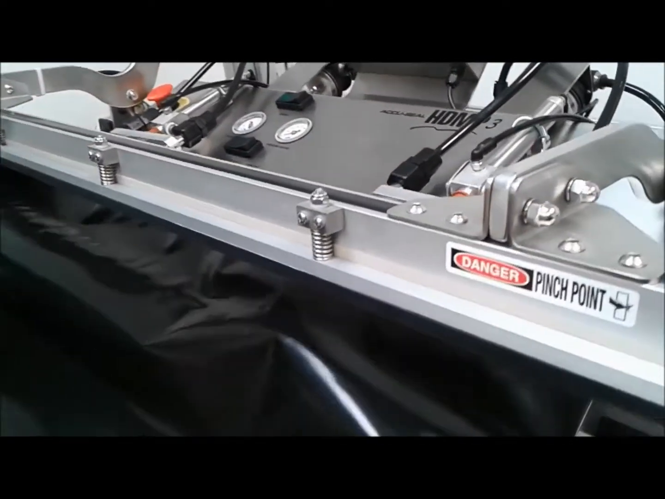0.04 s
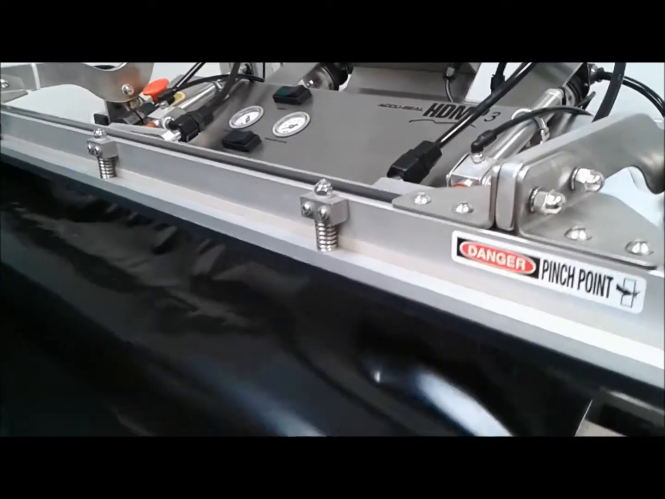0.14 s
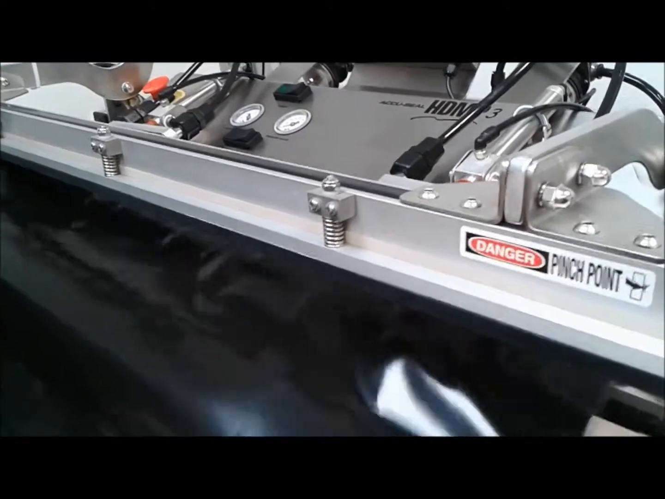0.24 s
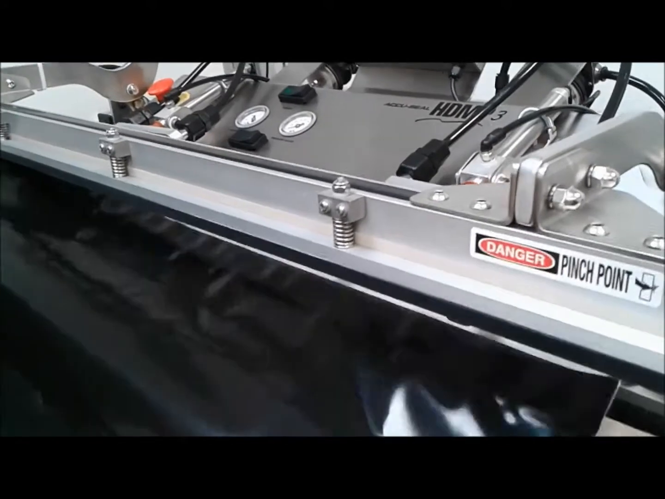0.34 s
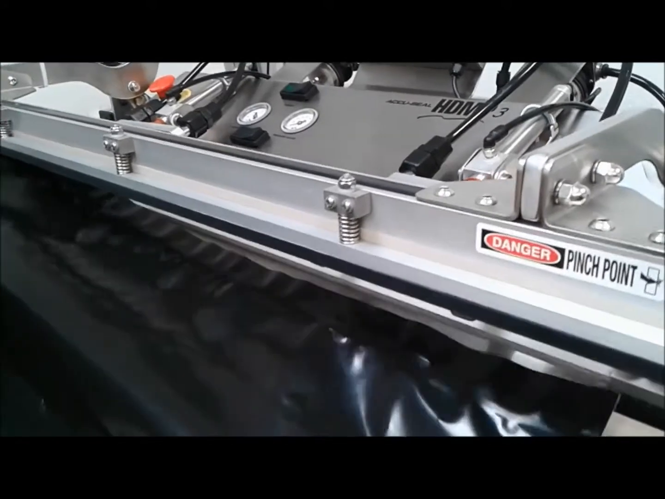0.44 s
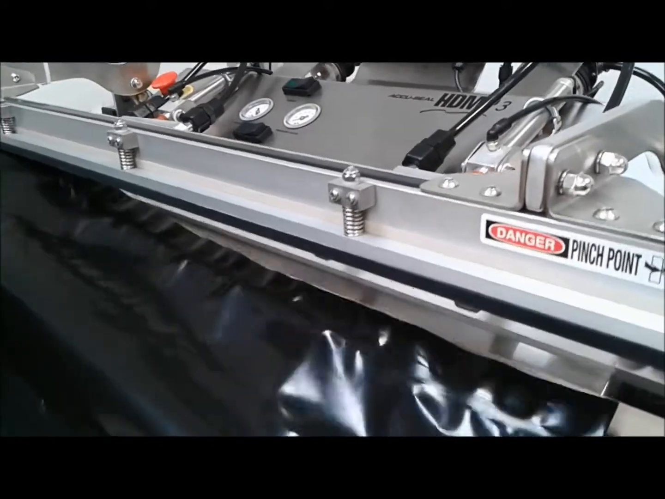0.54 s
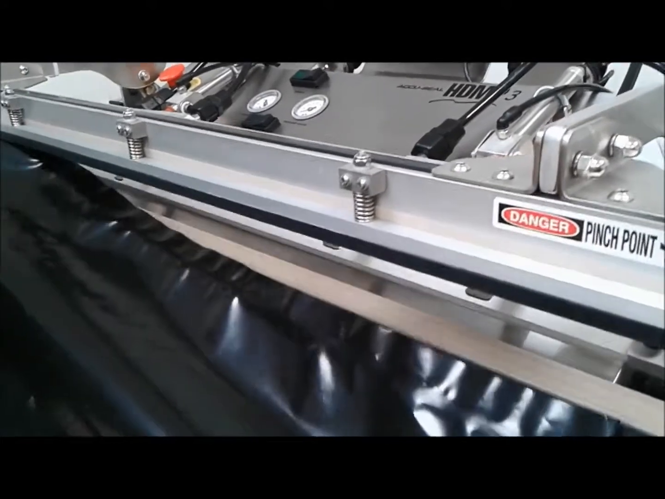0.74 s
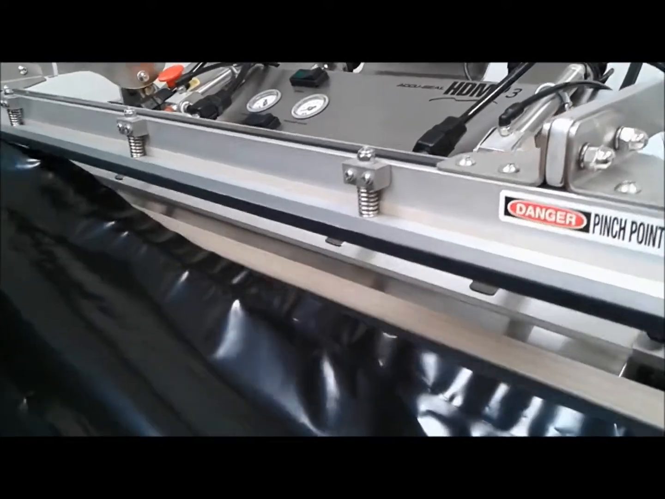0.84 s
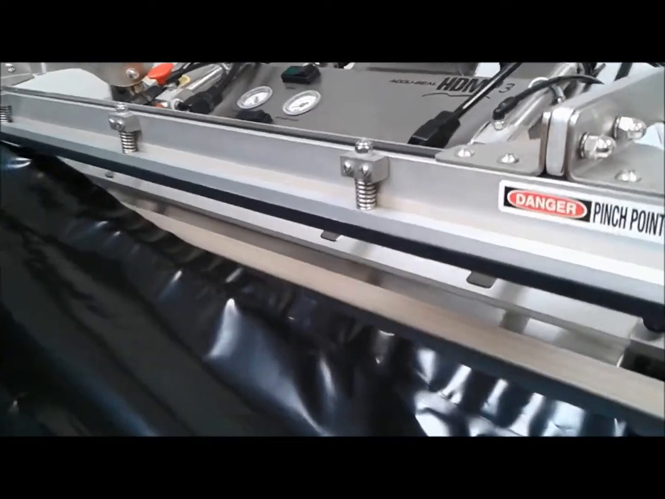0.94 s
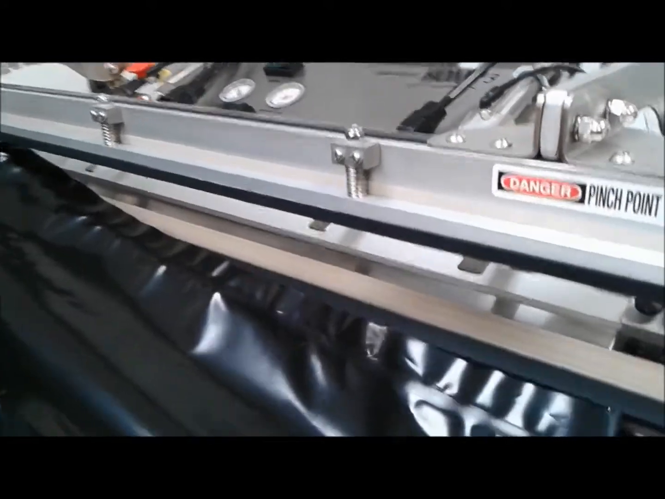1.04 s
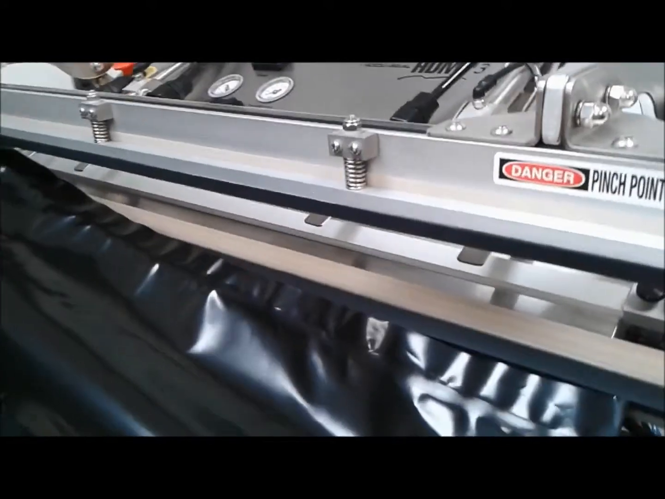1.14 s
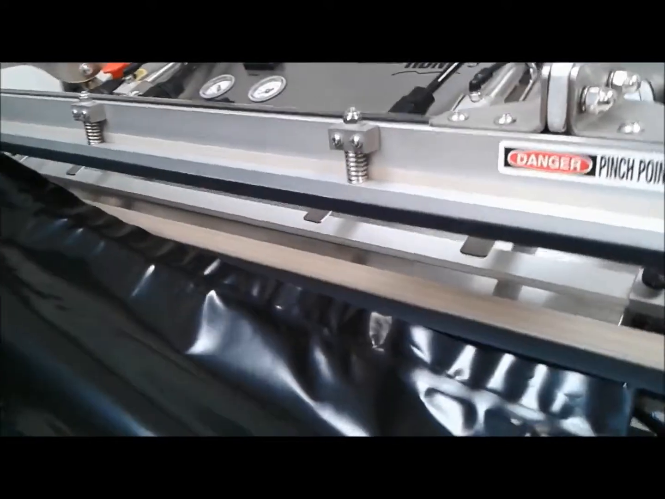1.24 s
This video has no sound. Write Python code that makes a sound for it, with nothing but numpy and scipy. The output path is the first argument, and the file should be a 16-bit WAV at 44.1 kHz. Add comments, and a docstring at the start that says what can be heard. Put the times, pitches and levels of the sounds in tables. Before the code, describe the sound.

A table-top bag sealer vents compressed air close by. A faint thin squeak and film pop start it; the hiss swells until about 0.4 s. At 0.42 s the jaw releases with a very loud, dry metallic crack, tiny rebounds, a dull thud and short rattle. Breathy hiss continues with soft pops and a faint high fizz near 0.57 s, then falls away after 1.1 s, leaving faint room noise.

```python
"""A table-top bag sealer vents its air cylinders, close by, over a low motor hum and steady room noise.
A thin squeak opens; the hiss (shaped noise) swells while the plastic film pops (short fading sine cycles).
Near 0.42 s the jaw lets go: sharp cracks ring its modes, a rattle dies away and the table top thuds.
The hiss blows on with further pops and one high fizzing tick, then sinks away after about 1.1 s."""
import sys
import numpy as np
from scipy import signal
from scipy.io import wavfile
from scipy.ndimage import uniform_filter1d

SR = 44100
rng = np.random.default_rng(int(sys.argv[2]) if len(sys.argv) > 2 else 0)


def master_out(mix):
    """Clip the mix to full scale and print it as 16-bit PCM to the path in sys.argv[1]."""
    frames = np.transpose(np.atleast_2d(mix))
    ceiling = np.clip(frames, -1, 1)
    pcm = np.round(ceiling * 32767).astype(np.int16)
    wavfile.write(sys.argv[1], SR, pcm)


N = 57330

# Air flow through the vent, in three runs of rows joined by straight lines:
# start_s, level_db (rms), jet_resonance_hz, treble_db, rumble_db (both shares added to the colour)
AIR_FLOW = [
    [(0.0, -57.5, 2660, 2, 5.5), (0.162, -46, 2770, -1, -0.5), (0.38, -40, 2530, 1, 2.5),
     (0.4, -41, 2450, 1, -2)],
    [(0.47, -42, 2680, 4.5, 6.5), (0.702, -47, 2200, -2.5, 3), (0.73, -45, 2610, -2.5, 2.5),
     (0.78, -43, 2000, -5.5, -2.5), (0.83, -45.5, 2300, -4.5, 5.5), (0.928, -40, 2520, -4.5, -3.5),
     (1.044, -42.5, 2300, -1, 0), (1.082, -41, 2460, -6, -1.5), (1.15, -56.5, 2250, -0.5, 6)],
    [(1.17, -59.5, 2250, 6.5, 9), (1.192, -63.5, 2290, -3, 9), (1.198, -70.5, 2290, 9, 1),
     (1.252, -70, 2420, 8, 13), (1.274, -60.5, 2420, 0, 4), (1.28, -68.5, 2430, 15, 18),
     (1.3, -65, 2440, -5, -3)],
]
# Broad colour of the escaping air: frequency_hz, density_db (per Hz)
AIR_COLOUR = [(29, -42), (50, -12), (75, 2), (107, -11.5), (135, 1), (171, -6.5), (268, -10.5), (392, -3),
              (431, -9), (586, -9), (778, -9), (1580, -4), (2480, -3.5), (3400, -4.5), (4200, 0),
              (5170, -2.5), (6250, -7.5), (14300, -23)]
# Jaw release, main blow, then rebounds: start_s, level_db, pitch_hz, pan_db (left minus right)
JAW_BLOWS = [(.4173, -31, 4000, -8), (.41897, -7.4, 3700, 5), (.41924, -22, 6000, -10),
             (.41974, -19, 4200, -10), (.4202, -26, 2400, -6), (.4207, -26, 2600, 6), (.4240, -30, 6000, 3),
             (.4259, -29, 5500, -5), (.4310, -27, 1800, 0)]
# Ringing modes of jaw and frame: pitch_hz, level_db (relative to the blow), t60_s
JAW_MODES = [(330, -26, .02), (440, -34, .1), (594, -28, .13), (870, -27, .11), (800, -17, .015),
             (1035, -23, .025), (1190, -33, .1), (1500, -18, .008), (1850, -31, .08), (2400, -20, .014),
             (2800, -28, .01), (6600, -14, .004), (8200, -21, .004), (11000, -12, .0025),
             (13200, -18, .002)]
# Colour of the scattered tail of the click: frequency_hz, density_db (per Hz)
RATTLE_COLOUR = [(59, -44), (100, -35), (202, -33), (318, 8), (604, -4), (1330, -0.5), (1810, 2.5),
                 (3580, -4.5), (5080, -1.5), (14000, -28)]
# Pops of the plastic film: start_s, level_db (before the fade), pitch_hz, pan_db (left minus right)
FILM_POPS = [(.016, -29, 4380, 6), (.050, -47, 2740, 28), (.201, -44.5, 137, -3), (.333, -31.5, 865, -1.5),
             (.3475, -33, 820, -2), (0.375, -33, 780, -1), (.381, -45, 172, -11), (.383, -42, 450, -5),
             (0.514, -36.5, 350, -1), (0.572, -28, 2480, 10), (.574, -48, 199, 4), (.629, -32, 804, -2),
             (0.658, -49.5, 223, -32.5), (.815, -30.5, 680, -1), (.821, -42, 192, 0),
             (1.062, -28.5, 1100, -1), (1.125, -52.5, 235, -21)]
# Colour of the room noise: frequency_hz, density_db (per Hz)
ROOM_COLOUR = [(29, -32), (50, 3), (332, -7.5), (462, -9), (533, -19), (2150, -12.5), (7910, -29),
               (11300, -17.5), (14300, -21)]
# Likeness of the two ears in all noise: frequency_hz, likeness (0 to 1, no unit)
EAR_LIKENESS = [(60, 0.5), (99, 0.46), (160, 0.3), (270, 0.57), (450, 0.42), (740, 0.79), (1220, 0.12),
                (2010, 0.096), (3330, 0.094), (5500, 0.11), (9080, 0.18), (15000, 0.01)]
# Stereo balance of all noise: frequency_hz, left_minus_right_db
EAR_BALANCE = [(60, 2), (130, -3), (290, 0), (640, 0), (1410, -2.5), (3100, 2.5), (6820, -5.5), (15000, -1)]

# Air: widths are distances from the centre at which the lift falls to 1/e
TREBLE_HZ, RUMBLE_HZ = 5560, 970  # where the treble and rumble shares take over
NOZZLE_WIDTH_HZ, NOZZLE_DB = 870, 4.5  # drifting main resonance
WHISTLE_HZ, WHISTLE_WIDTH_HZ, WHISTLE_DB = 2620, 170, 3  # narrow steady band in the hiss
PATCH_DB, FLICKER_DB = 1, 1  # rms unevenness of the colour and of the level

# Jaw
CRACK_LEAD_S = .0006  # from the start of the crack to its deepest swing
CRACK_CYCLES = .75  # spread of the crack's bell-shaped swell
CRACK_EARLY = .15  # cycles by which the swell peaks before the deepest swing
RATTLE_DB, RATTLE_RISE_S, RATTLE_T60_S = -32, 0.005, 0.15
THUD_HZ, THUD_DB, THUD_PEAK_S = 175, -37, .013  # the table top swings up slowly after the blow

# Film and tick
POP_CYCLES, POP_FADE = 2.3, .8  # length in cycles, and exponential fading per cycle
SQUEAK_S, SQUEAK_LEN_S, SQUEAK_DB = .003, .015, -52.5
SQUEAK_HZ, SQUEAK_WIDTH_HZ = 6720, 300  # centre pitch and rms wobble
ECHO_DB, ECHO_T60_S = -8, 0.13  # nearby surfaces answer the pops and the squeak
TICK_S, TICK_DB, TICK_T60_S = .566, -54, 0.097
TICK_HZ, TICK_WIDTH_HZ = 14000, 2500  # the band is 20 dB down one width away

# Background and pick-up
HUM_HZ, HUM_WIDTH_HZ, HUM_DB = 138, 6.4, -66.5  # level at the strongest flow
HUM_FOLLOW = 0.46  # share of the flow's dB changes that the hum follows
ROOM_DB = -67
LAG_MS = .115  # a hit reaches the left ear later
TOP_HZ = 14600  # all noise ends here
LOW_CUT_HZ, EDGE_HZ = 60, 16037

# Grid for painting noise: bin frequencies (Hz) down, frame times (s) across
FFT_SIZE, HOP = 512, 128
HZ = np.fft.rfftfreq(FFT_SIZE, 1 / SR)[:, None]
FRAMES = np.arange(N // HOP + 5) * HOP / SR


def amp(db):
    """Turns dB into gain."""
    return 10 ** (np.asarray(db) / 20)


def evened(x):
    """Scales to rms 1."""
    return x / np.sqrt(np.mean(x ** 2) + 1e-20)


def read(points, hz):
    """Reads a spectrum table on a log frequency axis."""
    f, value = np.transpose(points)
    return np.interp(np.log(hz + 1), np.log(f + 1), value)


def flow(t, column):
    """Reads one column of the air flow at times t."""
    rows = np.vstack(AIR_FLOW)
    return np.interp(t, rows[:, 0], rows[:, column])


def add(mix, start_s, sound, pan_db):
    """Places a sound in both ears, the left a little late."""
    for ear, lag_s, side in ((0, LAG_MS / 1000, .5), (1, 0, -.5)):
        part = mix[ear, round((start_s + lag_s) * SR):][:len(sound)]
        part += amp(side * pan_db) * sound[:len(part)]


def dying(start_s, db, rise_s, t60_s):
    """Envelope that rises at its start and dies away exponentially."""
    since = np.maximum(np.arange(N) / SR - start_s, 0)
    return (1 - np.exp(-since / rise_s)) * amp(db - 60 * since / t60_s)


def noise(field_db):
    """Two-ear noise painted from a dB field over frequency and time, partly shared by the ears."""
    a, b, c, d = rng.standard_normal((len(FRAMES), len(HZ), 4)).T
    likeness = np.clip(read(EAR_LIKENESS, HZ), -1, 1)
    right = a + 1j * b
    left = likeness * right + np.sqrt(1 - likeness ** 2) * (c + 1j * d)
    balance = amp(.5 * read(EAR_BALANCE, HZ))
    spectra = np.array([left * balance, right / balance]) * amp(field_db)
    spectra = spectra / (1 + (HZ / TOP_HZ) ** 120)
    return signal.istft(spectra, nperseg=FFT_SIZE, noverlap=FFT_SIZE - HOP)[1][:, :N]


def steady_noise(colour):
    """Noise of one unchanging colour at rms 1."""
    return evened(noise(read(colour, HZ) + 0 * FRAMES))


def air():
    """Turbulent hiss: noise coloured by a drifting nozzle resonance, with patches and flicker."""
    patches = rng.standard_normal((len(FRAMES), len(HZ))).T
    patches = uniform_filter1d(patches, size=6, axis=0)
    patches = evened(uniform_filter1d(patches, size=14, axis=1))
    flicker = evened(uniform_filter1d(rng.standard_normal(len(FRAMES)), size=3))
    nozzle = NOZZLE_DB * np.exp(-((HZ - flow(FRAMES, column=2)) / NOZZLE_WIDTH_HZ) ** 2)
    whistle = WHISTLE_DB * np.exp(-((HZ - WHISTLE_HZ) / WHISTLE_WIDTH_HZ) ** 2)
    treble = flow(FRAMES, column=3) / (1 + (TREBLE_HZ / (HZ + 1)) ** 4)
    rumble = flow(FRAMES, column=4) / (1 + (HZ / RUMBLE_HZ) ** 4)
    field_db = read(AIR_COLOUR, HZ) + nozzle + whistle + treble + rumble
    field_db = field_db + PATCH_DB * patches + FLICKER_DB * flicker
    return amp(flow(np.arange(N) / SR, column=1)) * evened(noise(field_db))


def jaw_ring(t):
    """Decaying sines of the jaw and frame modes, their sign turned over every three modes."""
    since = np.maximum(t - .25 * CRACK_LEAD_S, 0)
    ring = np.zeros(len(t))
    for k, (hz, db, t60_s) in enumerate(JAW_MODES):
        sign = (-1) ** (k // 3)
        ring += sign * amp(db - 60 * since / t60_s) * np.sin(2 * np.pi * hz * since)
    return ring * np.minimum(since / CRACK_LEAD_S, 1)


def table_thud(t):
    """A low sine of the table top that swells slowly and sinks again."""
    swell = (t / THUD_PEAK_S * np.exp(1 - t / THUD_PEAK_S)) ** 5
    return amp(THUD_DB) * swell * np.sin(2 * np.pi * THUD_HZ * t)


def jaw():
    """Each blow is a brief crack that rings the jaw modes; the main one adds a thud and a rattle."""
    out, t = np.zeros((2, N)), np.arange(SR // 5) / SR
    ring = jaw_ring(t)
    for start_s, db, hz, pan_db in JAW_BLOWS:
        cycles = (t - CRACK_LEAD_S) * hz
        swell = np.exp(-.5 * ((cycles + CRACK_EARLY) / CRACK_CYCLES) ** 2)
        crack = -swell * np.cos(2 * np.pi * cycles)
        add(out, start_s - CRACK_LEAD_S, amp(db) * crack, pan_db)
        add(out, start_s - CRACK_LEAD_S, amp(db) * ring, 0)
    main_blow_s = JAW_BLOWS[1][0]
    add(out, main_blow_s, table_thud(t), -3)
    rattle = steady_noise(RATTLE_COLOUR)
    return out + dying(main_blow_s, RATTLE_DB, RATTLE_RISE_S, RATTLE_T60_S) * rattle


def squeak():
    """A short sine whose pitch wobbles at random."""
    t = np.arange(int(SQUEAK_LEN_S * SR)) / SR
    wobble = evened(uniform_filter1d(rng.standard_normal(len(t)), size=40))
    turns = np.cumsum(SQUEAK_HZ + SQUEAK_WIDTH_HZ * wobble) / SR
    swell = np.sin(np.pi * t / SQUEAK_LEN_S) ** .5
    return amp(SQUEAK_DB) * swell * np.sin(2 * np.pi * turns)


def film():
    """Soft pops of the shifting film as short fading sines, one thin squeak, and their echo."""
    out = np.zeros((2, N))
    for start_s, db, hz, pan_db in FILM_POPS:
        cycles = np.arange(int(POP_CYCLES * SR / hz)) * hz / SR
        swell = np.sin(np.pi * cycles / POP_CYCLES) * np.exp(-POP_FADE * cycles)
        add(out, start_s, -amp(db) * swell * np.sin(2 * np.pi * cycles), pan_db)
    add(out, SQUEAK_S, squeak(), 0)
    # Echo: decaying random taps, silent for the first 2 ms
    t = np.arange(SR // 10) / SR
    taps = rng.standard_normal((2, len(t))) * amp(-60 * t / ECHO_T60_S) * (t > .002)
    taps = taps / np.linalg.norm(taps[0])
    return out + amp(ECHO_DB) * signal.fftconvolve(out, taps, axes=1)[:, :N]


def tick():
    """A brief, thin, very high fizz: a band of noise that dies away."""
    band = noise(-20 * ((HZ - TICK_HZ) / TICK_WIDTH_HZ) ** 2 + 0 * FRAMES)
    return dying(TICK_S, TICK_DB, .002, TICK_T60_S) * evened(band)


def hum():
    """Low motor tone, wavering by slow random drift, that swells with the flow."""
    t = np.arange(N) / SR
    pole = np.exp(-np.pi * HUM_WIDTH_HZ / SR)
    drift = rng.standard_normal(N) + 1j * rng.standard_normal(N)
    drift = signal.lfilter([1 - pole], [1, -pole], drift)
    waver = 1 + drift / np.abs(drift).std() * .5
    tone = evened((waver * np.exp(2j * np.pi * HUM_HZ * t)).real)
    level_db = flow(t, column=1)
    return amp(HUM_DB + HUM_FOLLOW * (level_db - level_db.max())) * tone


def room():
    """Steady workshop noise of a fixed colour."""
    return amp(ROOM_DB) * steady_noise(ROOM_COLOUR)


def scene():
    """Mixes all sources, the hum equally in both ears."""
    return air() + jaw() + film() + tick() + hum() + room()


def record(dry):
    """Microphone low cut, then the steep upper band limit of the recorder."""
    low_cut = signal.butter(3, LOW_CUT_HZ, "high", fs=SR, output="sos")
    cut = signal.sosfilt(low_cut, dry)
    band_limit = signal.firwin(511, EDGE_HZ, window=("kaiser", 9), fs=SR)
    return signal.oaconvolve(cut, band_limit[None], "same")


dry = scene()
out = record(dry)
master_out(out)
```